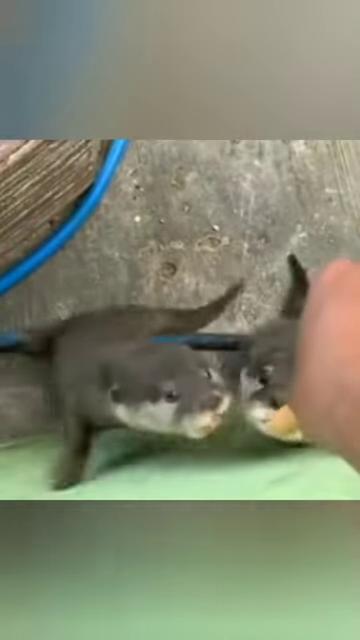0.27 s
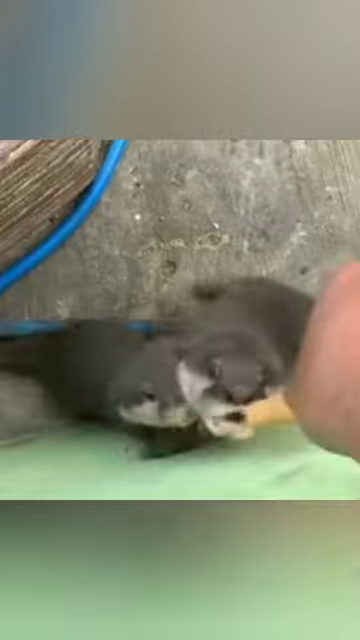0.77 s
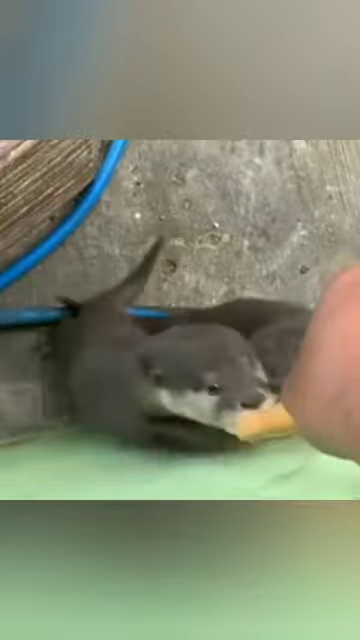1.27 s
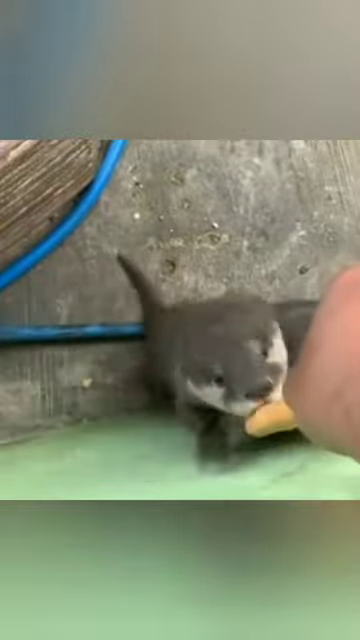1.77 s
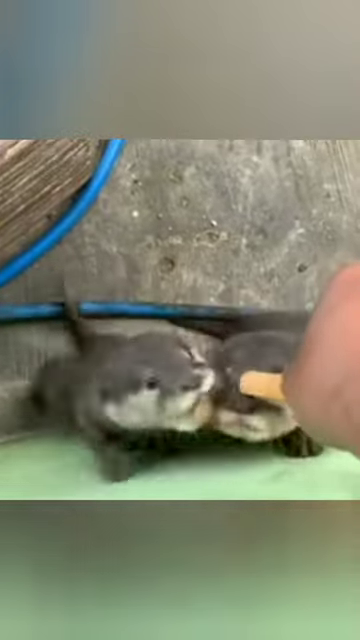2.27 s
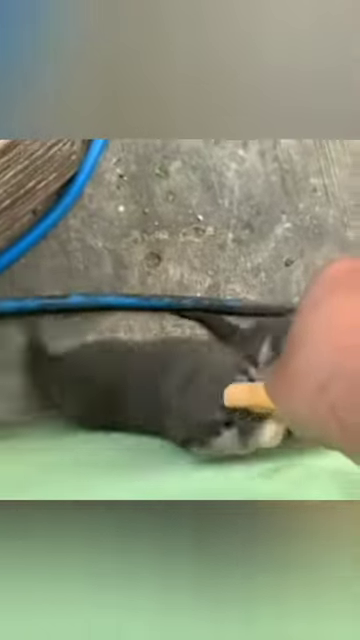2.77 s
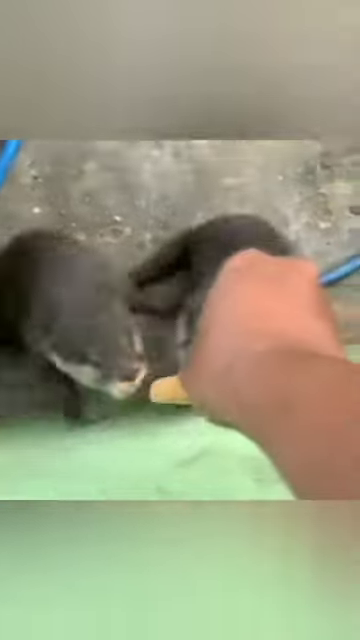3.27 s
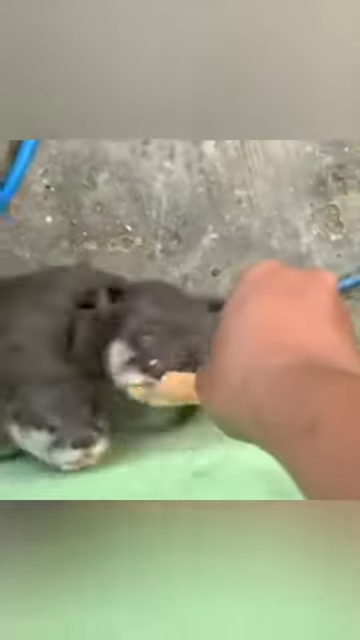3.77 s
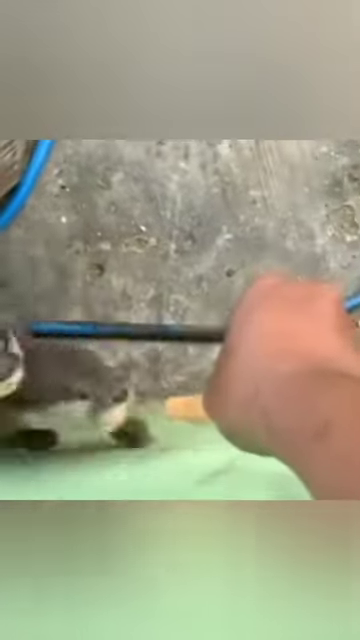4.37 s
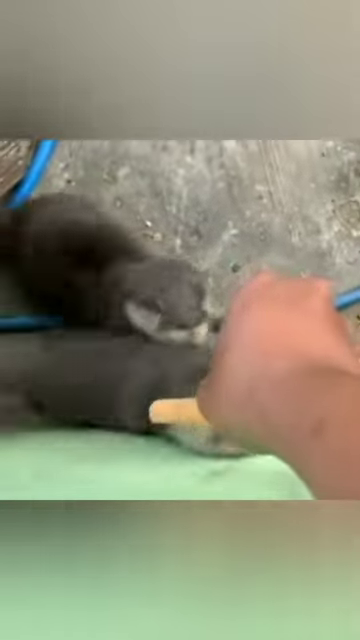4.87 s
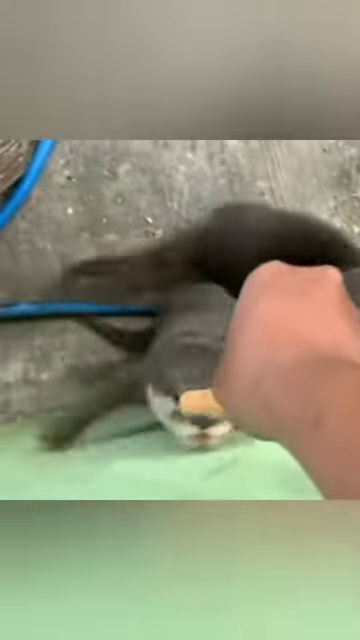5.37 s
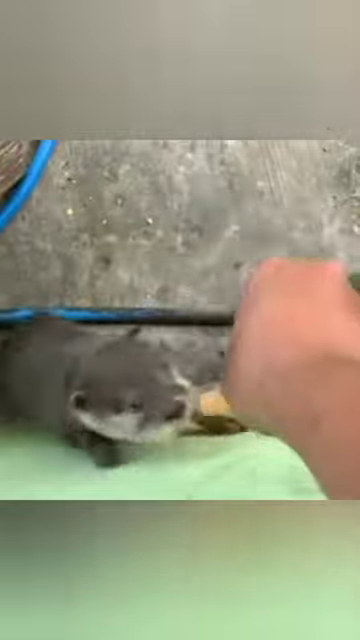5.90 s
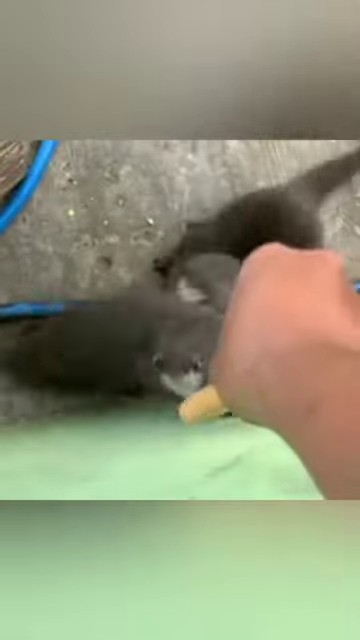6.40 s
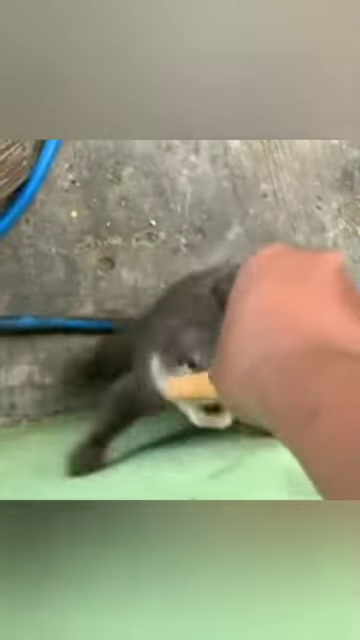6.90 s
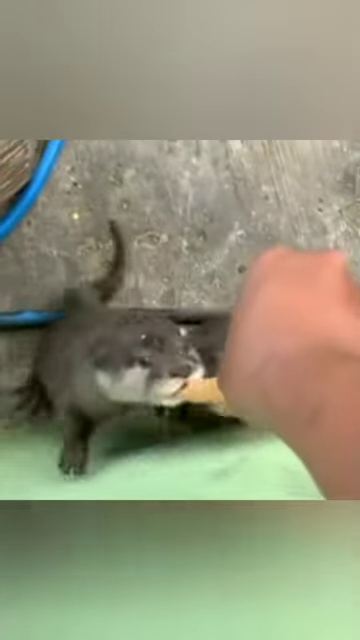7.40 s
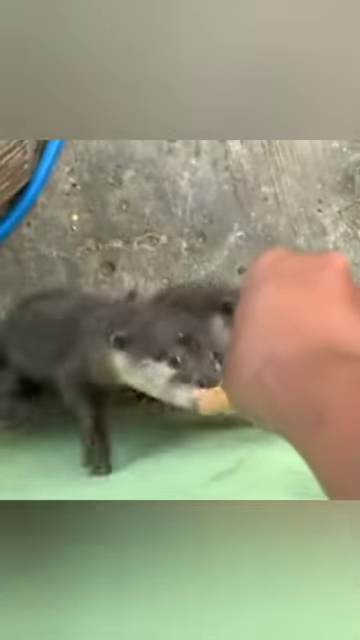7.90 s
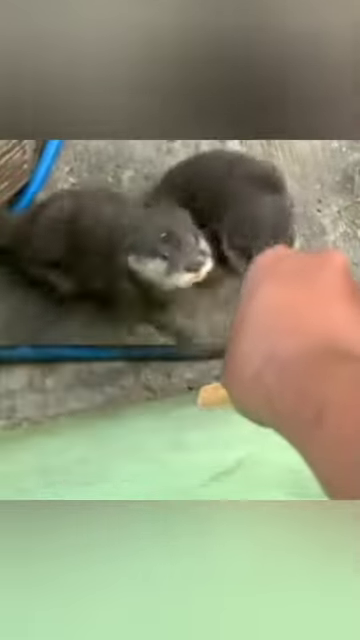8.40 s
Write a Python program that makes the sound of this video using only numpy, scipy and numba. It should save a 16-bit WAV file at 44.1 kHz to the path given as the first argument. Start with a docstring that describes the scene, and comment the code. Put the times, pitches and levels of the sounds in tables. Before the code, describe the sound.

The sound opens mid-scream: a close otter pup's shrill, raspy cry wavers until about 0.8 s, with thin high whistles near 0.5 and 0.75 s. At 1.0 and 2.0 s come long squeals of about three quarters of a second, each whistle diving steeply into a voice around 1.2 kHz, clear then harsh. Shorter cries follow at 3.0 and 3.6 s, then a longer, partly clear one from 4.1 to 4.8 s. A tiny bright click of teeth or claws marks 5.1 s as a brief squeal starts; a higher, purer one comes at 5.9 s, another at 6.5 s. After a gap, a short yelp at 7.15 s leads into a rough cry to 7.8 s, and a last uneven squeal runs from 8.1 s to the end. Hard walls give short echoes. Faint hiss, rumble and a fading hum lie beneath; a distant engine drones from about 6.5 s, slowly dropping in pitch.

```python
"""Two otter pups beg at a hand on a concrete yard; it opens mid-scream, over swelling low noise, rumble, hiss and a fading hum.
Most later cries open with a whistle, an arching near-sine; then the vocal folds take over as a pulse train,
now clean stacks of harmonics, now a harsh irregular scream, shaped by throat and a moving mouth resonance.
From about 4 s come two small ticks of teeth or claws, and a small engine passes far off, a stack of low sines.
The yard adds short echoes; left and right differ in phase and level."""
import sys
import numpy as np
from scipy import signal
from scipy.fft import rfft, irfft, next_fast_len
from scipy.io import wavfile
from scipy.ndimage import uniform_filter1d
from numba import njit

SR = 44100
rng = np.random.default_rng(int(sys.argv[2]) if len(sys.argv) > 2 else 0)


def transcribe(u):
    """Save the signal u as a 16-bit wav file named by the first command-line argument.

    u: samples, shape (n,) or (channels, n), limited to [-1, 1]; the rate is SR.
    q: integer samples, one column per channel.
    """
    v = np.clip(np.atleast_2d(u).T, -1, 1)
    q = np.round(v * 32767).astype(np.int16)
    wavfile.write(sys.argv[1], SR, q)


N = 381447

# whistles: start t/s, length t/s, first f/Hz, top f/Hz, last f/Hz, first level/dB, peak level/dB,
# top at [share of length], loudest at [share of length],
# fall shape [power: over 1 hangs then drops, under 1 drops then levels off], raggedness [-]
WHISTLES = [(0.499, 0.1067, 7900, 8360, 4870, -40.5, -24, 0.238, 0.258, 0.86, .3),
            (0.729, 0.0833, 6720, 8515, 5514, -24.5, -18, .42, 0.676, 1.89, .3),
            (.4, .22, 1500, 2020, 1950, -47, -40, .7, .7, 1.0, 1.2),
            (0.823, 0.1146, 4600, 4492, 4019, -30.5, -24.5, 0.212, 0.812, 0.96, .15),
            (0.962, 0.0698, 6600, 8684, 2770, -28, -19, .38, 0.567, 2.1, .5),
            (1.951, .067, 6300, 8206, 3190, -18, -15.5, 0.237, 0.5, 1.65, .45),
            (2.923, 0.06, 7200, 8052, 2670, -22.5, -17, 0.244, 0.547, 2.465, .6),
            (3.455, 0.1042, 6700, 8920, 5880, -51.5, -23, .36, 0.65, 0.488, .25),
            (3.536, 0.058, 6600, 7900, 3136, -30, -12.5, .5, 0.36, 2.6, .4),
            (4.042, 0.062, 6300, 8379, 3072, -23.5, -13.5, 0.29, .38, 2.55, .6),
            (4.82, 0.139, 7130, 5974, 4930, -53, -37, 0.174, 0.66, 0.815, .15),
            (5.049, 0.07, 6800, 8400, 3350, -26, -17.5, 0.35, 0.5, 3.2, 1.1),
            (5.782, 0.084, 6800, 8500, 2240, -38, -14, .22, .47, 1.6, .35),
            (6.295, 0.1145, 6600, 9076, 5748, -66, -28.5, .3, 0.6, 0.56, .3),
            (6.425, 0.0745, 6800, 9230, 2700, -62, -19, .3, 0.498, 1.154, .2),
            (6.493, 0.046, 3100, 2450, 2400, -34, -28, 0.75, .85, 1.57, .1),
            (7.655, .157, 1550, 1802, 1295, -35, -34, .45, 0.88, 2.6, .5),
            (8.051, 0.0629, 7600, 8910, 4039, -40, -14.5, .5, 0.49, 2.385, .45)]
RISE_POWER = 2.1   # the pitch rise rounds off into the top
ENDING_DB = -17   # a whistle ends this far below its peak
BEATEN_BELOW_HZ, BEATEN_DB = 2000, -3   # low whistles are beaten by the folds; lines above them, full at the end

# vocal fold rate in each cry, often dropping in from above as the whistle breaks: t/s, f/Hz
FOLDS = [(0, 1270), (.09, 1111), (.135, 1300), (.22, 1171), (.43, 1100), (.5, 1169), (.65, 1109),
         (.8, 1061), (1.0, 1800), (1.03, 1430), (1.08, 1390), (1.105, 1035), (1.168, 1075), (1.194, 1150),
         (1.206, 1080), (1.24, 1231), (1.27, 1221), (1.4, 1270), (1.495, 1310), (1.51, 1130), (1.75, 1101),
         (1.99, 2100), (2.01, 1560), (2.052, 1314), (2.072, 1318), (2.088, 1234), (2.112, 1301),
         (2.146, 1284), (2.17, 1187), (2.2, 1200), (2.24, 1109), (2.45, 1200), (2.62, 1084), (2.77, 1060),
         (2.96, 2150), (2.978, 1620), (3.0, 1403), (3.058, 1226), (3.088, 1270), (3.122, 1290),
         (3.154, 1314), (3.174, 1258), (3.22, 1260), (3.57, 2200), (3.595, 1612), (3.636, 1282),
         (3.652, 1226), (3.67, 1282), (3.704, 1206), (3.736, 1248), (3.87, 1239), (4.08, 2200),
         (4.098, 1619), (4.13, 1330), (4.185, 1180), (4.2, 1215), (4.244, 1170), (4.342, 1250),
         (4.364, 1128), (4.412, 1250), (4.458, 1247), (4.475, 1180), (4.55, 1280), (4.6, 1180),
         (4.62, 1230), (4.675, 1280), (4.72, 1070), (4.8, 1039), (5.105, 1389), (5.15, 1322), (5.176, 1387),
         (5.238, 1136), (5.288, 1247), (5.304, 1237), (5.328, 1284), (5.345, 1269), (5.9, 1347),
         (5.95, 1321), (5.976, 1280), (5.996, 1375), (6.015, 1375), (6.03, 1440), (6.052, 1381),
         (6.058, 2183), (6.13, 1995), (6.53, 1387), (6.56, 1423), (6.6, 1272), (6.68, 1246), (6.72, 1300),
         (6.78, 1240), (6.83, 1264), (7.155, 970), (7.23, 1140), (7.28, 1204), (7.5, 1073), (7.58, 1197),
         (7.62, 1106), (7.67, 1100), (7.74, 1278), (7.81, 970), (8.09, 1900), (8.11, 1466), (8.16, 1260),
         (8.21, 1270), (8.25, 1414), (8.32, 1184), (8.37, 1299), (8.44, 1233), (8.5, 1309), (8.538, 1264),
         (8.544, 1905), (8.57, 1800), (8.605, 2071), (8.613, 1495), (8.65, 1372)]
# screams, one list a cry: t/s, level/dB below the treble split, treble level/dB, mouth resonance f/Hz
SCREAMS = [
    [(0, -24.5, -30.5, 2550), (.05, -28, -26, 2605), (.105, -34, -23.5, 2700), (.14, -28.5, -27.5, 2820),
     (.2, -28, -26.5, 2610), (.28, -33.5, -34, 2450), (.39, -40.5, -54.5, 1680), (.46, -33.5, -42.5, 1880),
     (.55, -32, -43.5, 1930), (.63, -29, -31.5, 2110), (.68, -24, -28.5, 2240), (.74, -28, -34, 2275),
     (.795, -31, -34, 2306)],
    [(1.0, -45, -40, 4000), (1.03, -28, -18, 3090), (1.046, -35.5, -28, 2950), (1.09, -27.5, -21.5, 3060),
     (1.12, -31, -25, 3210), (1.2, -31.5, -29, 3005), (1.23, -30.5, -31, 2640), (1.29, -30.5, -33.5, 2750),
     (1.37, -30, -23, 2780), (1.41, -26, -21.5, 3220), (1.46, -25, -31, 3210), (1.53, -26, -31, 2890),
     (1.64, -31.5, -31, 3074), (1.735, -27.5, -30.5, 3220), (1.755, -30.5, -40, 3220)],
    [(1.99, -45, -35, 4200), (2.01, -28, -20.5, 3030), (2.04, -35, -26.5, 2906), (2.09, -36, -28.5, 2630),
     (2.15, -33, -30, 2670), (2.19, -36, -30, 2770), (2.225, -32.5, -27, 3230), (2.3, -35, -27, 2920),
     (2.35, -34.5, -30.5, 2880), (2.43, -34.5, -32, 2950), (2.53, -31.5, -34, 2595), (2.62, -32, -35, 2270),
     (2.71, -28.5, -30, 2620), (2.765, -33.5, -44, 2600)],
    [(2.96, -42, -35, 4300), (2.975, -35, -24.5, 3060), (3.01, -32, -28.5, 2820), (3.05, -33, -28.5, 2780),
     (3.1, -36.5, -28.5, 2710), (3.135, -33.5, -29, 2880), (3.165, -35.5, -24, 3650),
     (3.195, -30, -38.5, 3760), (3.217, -32, -41.5, 3790)],
    [(3.57, -48, -38, 4400), (3.59, -37, -30, 3010), (3.635, -28.5, -29, 2620), (3.7, -30, -31.5, 2490),
     (3.75, -34, -40.5, 2960), (3.785, -34.5, -44, 2640), (3.825, -27.5, -28.5, 2578),
     (3.87, -36, -35, 2630)],
    [(4.08, -46, -35, 4400), (4.095, -35.5, -27.5, 3080), (4.11, -31, -22.5, 3060),
     (4.14, -32.5, -22.5, 2940), (4.19, -33, -21.5, 2720), (4.295, -39, -28.5, 2510),
     (4.34, -36.5, -25, 2530), (4.42, -33.5, -32.5, 2530), (4.47, -33.5, -33.5, 2520),
     (4.55, -27.5, -33, 2610), (4.595, -35.5, -37.5, 2910), (4.625, -23, -37.5, 2660),
     (4.665, -24, -34.5, 2470), (4.71, -31.5, -48.5, 1980), (4.77, -31.5, -41.5, 2020),
     (4.8, -37.5, -48.5, 2040)],
    [(5.105, -44.5, -12, 2830), (5.125, -29.5, -28, 2800), (5.175, -43.5, -37, 2580),
     (5.205, -27, -31, 2550), (5.245, -40.5, -35, 2360), (5.278, -29, -34.5, 2450), (5.335, -30, -31, 2990),
     (5.352, -34.5, -44, 3180)],
    [(5.85, -60, -50, 3000), (5.87, -52, -43, 2500), (5.9, -49, -46, 2120), (5.92, -34.5, -43, 2150),
     (5.95, -33.5, -37.5, 2450), (5.975, -27, -45.5, 2600), (6.008, -32.5, -33.5, 2630),
     (6.03, -33, -45.5, 2630), (6.06, -34.5, -39, 2210), (6.09, -34.5, -34, 2170),
     (6.135, -47.5, -43.5, 2155)],
    [(6.53, -34, -32, 2510), (6.56, -30.5, -42.5, 1900), (6.6, -28, -40, 1800), (6.632, -25.5, -28.5, 2610),
     (6.68, -29.5, -35, 2740), (6.715, -26.5, -24, 3045), (6.76, -31, -28.5, 2890),
     (6.795, -29, -32.5, 2850), (6.835, -27.5, -44.5, 3160)],
    [(7.155, -42, -55.5, 3020), (7.166, -28.5, -41.5, 3040), (7.22, -28.5, -31.5, 2950),
     (7.238, -40, -45, 2970)],
    [(7.28, -34, -35.5, 2447), (7.345, -38, -42.5, 2490), (7.375, -32.5, -31.5, 2630),
     (7.5, -29.5, -34.5, 3150), (7.54, -28.5, -27.5, 2800), (7.572, -28.5, -23.5, 2520),
     (7.6, -29, -30.5, 2780), (7.612, -28.5, -36, 3330), (7.652, -30, -40, 3300), (7.672, -31.5, -41, 1780),
     (7.7, -34.5, -48, 1766), (7.74, -30.5, -49, 1750), (7.765, -38, -50, 1230), (7.812, -42, -57.5, 1020)],
    [(8.09, -44, -35, 3200), (8.11, -28, -31, 2830), (8.155, -29.5, -29.5, 2600), (8.2, -36, -31.5, 2520),
     (8.22, -40, -53.5, 2430), (8.26, -38, -48.5, 1750), (8.303, -26, -37, 2430), (8.35, -35, -36, 2450),
     (8.375, -17.5, -34.5, 2580), (8.4, -33, -32.5, 2620), (8.44, -41.5, -57.5, 2400),
     (8.465, -37, -49, 1800), (8.505, -26, -36, 2590), (8.545, -39.5, -41, 1960), (8.6, -34.5, -54.5, 2150),
     (8.649, -43.5, -68.5, 2600)],
]
# throat and mouth colour: f/Hz, level/dB
THROAT = [(300, -48), (850, -11), (1030, -3.5), (1300, 1.5), (1700, 6.5), (2400, -0.5), (3300, 2),
          (4200, 4.5), (5000, -1), (6500, -9.5), (8000, -11.5), (10000, -13.5), (11500, -12),
          (13000, -10.5)]
MOUTH_DB, MOUTH_WIDTH_HZ, HARSH_WIDENS = 8.5, 430, .9   # width of a smooth voice; roughness widens it by this share
HARSH, SETTLE_S = .85, .015   # usual roughness (0-1) before the rasp; time to settle or break up
# passages with their own roughness, mostly clearer: start t/s, end t/s, roughness [0-1]
CLEARER = [(0, .125, .25), (.24, .42, .55), (1.0, 1.095, .95), (1.095, 1.19, .22), (1.19, 1.27, .35),
           (1.27, 1.43, .7), (1.43, 1.51, .17), (2.0, 2.035, .75), (2.035, 2.19, .16), (2.19, 2.64, .67),
           (2.975, 3.055, .55), (3.055, 3.125, .3), (3.15, 3.28, .25), (3.595, 3.69, .5), (3.69, 3.755, .3),
           (3.755, 3.79, .6), (3.79, 3.88, 1.0), (4.1, 4.2, .6), (4.2, 4.47, .27), (4.595, 4.68, .05),
           (5.15, 5.25, .28), (5.25, 5.345, .14), (5.945, 6.015, .17), (6.015, 6.055, .55),
           (6.055, 6.13, .2), (6.62, 6.66, .35), (6.66, 6.695, .5), (6.775, 6.87, .15), (7.15, 7.21, .3),
           (7.27, 7.33, .4), (7.33, 7.59, .95), (7.6, 7.66, .12), (7.76, 7.83, .27), (8.125, 8.21, .15),
           (8.29, 8.345, .2), (8.358, 8.4, .25), (8.54, 8.65, .4)]
# strong-weak beating of the folds, which adds half-way lines: t/s, depth [0-1]
ALTERNATE = [(1.445, 0), (1.46, .4), (1.498, .4), (1.505, 0)]
RELEASE_DB_PER_S, EDGE_S = 2500, .007   # how fast a cry dies as it breaks off; span that softens its edges

# small ticks of teeth or claws: t/s, envelope peak level/dB, ring f/Hz
TICKS = [(4.0138, -45, 1800), (5.0883, -15, 8000)]
TICK_S = .0006   # time to swell to the peak, and decay constant

# low noise swelling, mostly under the rough screams: t/s, peak level/dB, time to fade 10 dB either side t/s
LOW_SWELLS = [(.04, -55.5, 0.074), (.21, -52.5, 0.0425), (.68, -54, 0.18), (1.08, -51, 0.01),
              (1.5, -53, 0.1465), (2.4, -59.5, 0.13), (2.7, -57, 0.01), (3.66, -64, 0.17),
              (4.17, -52, 0.03), (4.55, -56, 0.0266), (7.44, -48, 0.01), (7.68, -48, 0.09),
              (7.78, -46, 0.0731)]
# steady low noise that grows as the engine nears: t/s, level/dB
NEARING = [(0, -77.5), (2, -78), (3.1, -66), (5.7, -66), (6.7, -54), (7.6, -55.5), (8.65, -56.5)]
# colour of both: f/Hz, level/dB per Hz
LOW_NOISE_COLOUR = [(120, -36.5), (250, -5), (320, -1.5), (500, -7.5), (800, -8.5), (1000, -24)]

# engine, slowing as it nears: t/s, firing f/Hz, second multiple level/dB, fourth multiple level/dB
ENGINE = [(4.2, 54.36, -82.5, -81), (4.5, 54.35, -69.5, -67), (5.7, 53.47, -71.5, -66),
          (6.07, 52.65, -61.5, -74.5), (6.4, 51.94, -51.5, -72.5), (6.9, 51.55, -42, -59.5),
          (7.37, 49.53, -43.5, -48), (7.8, 47.94, -45, -43), (8.13, 47.04, -43, -49),
          (8.65, 45.14, -48, -48)]
# its other multiples: multiple [-], level/dB when near, share of the second's swell that it follows [0-1]
ENGINE_ORDERS = [(1, -57, .25), (3, -60, .6), (5, -64.5, .4), (6, -58.5, 0.36), (7, -66, 0.65),
                 (8, -67.5, 0.36), (9, -63.5, 0.3)]

# a faint hum that fades: t/s, f/Hz, level/dB
HUM = [(0, 142.7, -65.5), (1.5, 138.5, -71), (2.3, 146.3, -83.5), (8.65, 139.7, -99.5)]
# traffic rumble: t/s, level/dB
RUMBLE_LEVEL = [(0.0, -63), (8.65, -58)]
# its colour: f/Hz, level/dB per Hz
RUMBLE_COLOUR = [(12, -29.5), (20, -9.5), (71, -0.5), (147, -8.5), (218, -3), (270, -7.5), (471, -18.5),
                 (1000, -47.5), (1300, -57.5), (2200, -120)]
# outdoor hiss colour: f/Hz, level/dB per Hz
HISS_COLOUR = [(240, -47.5), (400, -29.5), (470, -12.5), (680, -27), (860, -13.5), (1510, -8), (1640, -13),
               (2240, -11), (4960, -19), (9000, -28), (13500, -40)]
HISS_DB = -61.5

# phase between the channels: f/Hz, right behind left [radians]
STEREO_PHASE = [(100, 0), (2000, .15), (2900, .5), (3700, 2.4), (4800, 2.9), (5500, 3.2), (6200, 4.2),
                (7000, 5.7), (8300, 6.28), (9600, 6.7), (10400, 7.8), (11200, 9.3), (13500, 9.42)]
# balance between the channels: f/Hz, left minus right level/dB
STEREO_BALANCE = [(100, 0), (700, -1.5), (2500, -0.01), (3500, -8.5), (4500, -2), (6000, 1)]
YARD_T60_S, YARD_DB, YARD_ABOVE_HZ = .33, -16.5, 900   # one echo tail for both channels
APART_T60_S, APART_DB, APART_ABOVE_HZ = .08, -9, 2000   # near reflections, different in each channel
CUTOFF_HZ = 13835   # 60 dB down from here up


def whistles(octave_db=-14, waver=0.0091, flutter_db=3.0, air_db=-16, fray_hz=700, burst_db=-21, burst_s=.015):
    """Near sines with a faint octave; each frays toward its end and closes in a burst of air."""
    out = np.zeros(N)
    wobble, flutter, fray = drift(140), drift(130), drift(fray_hz)
    folds_phase = running_phase(in_time(sorted(FOLDS))[0])
    throaty = rms_one(filtered(coloured(rng.standard_normal(N), THROAT), 2, 2200, "high"))
    bright = rms_one(filtered(rng.standard_normal(N), 2, [5500, 11000], "band"))
    air = throaty * 0.3 + bright
    for (start_s, length_s, first_hz, top_hz, last_hz, first_db, peak_db,
         top_at, loud_at, fall, ragged) in WHISTLES:
        at = np.arange(int(start_s * SR), int((start_s + length_s) * SR))
        progress = np.linspace(0, 1, len(at))
        top_at, loud_at = np.clip([top_at, loud_at], .05, .95)
        pitch_hz = arch(progress, top_at, first_hz, top_hz, last_hz, RISE_POWER, np.clip(fall, .3, 4))
        level_db = arch(progress, loud_at, first_db, peak_db, peak_db + ENDING_DB, 1.02, 1.46)

        # the pitch wobbles more and more toward the end
        wobbling = 1 + waver * (.6 + 3 * progress ** 2) * wobble[at]
        phase = running_phase(pitch_hz * wobbling)
        tone = np.sin(phase) + amp(octave_db) * np.sin(2 * phase)
        if top_hz < BEATEN_BELOW_HZ:
            upper_lines = np.sin(phase + folds_phase[at]) + np.sin(phase + 2 * folds_phase[at])
            tone = tone + amp(BEATEN_DB) * progress ** 2 * upper_lines

        # the steady tone hands over to a noise-modulated one
        frayed = np.clip(1.5 * ragged * progress ** 3.5, 0, 1)
        tone = np.sqrt(2) * tone * (np.sqrt(1 - frayed) + np.sqrt(frayed) * fray[at])
        gain = amp(level_db + flutter_db * flutter[at]) * signal.windows.tukey(len(at), .11)
        out[at] += gain * (tone + amp(air_db) * progress ** 2 * air[at])

        # the burst peaks where the tone stops
        near = np.arange(at[0], min(at[-1] + SR // 10, N))
        burst = np.exp(-((near - at[-1]) / SR / burst_s) ** 2)
        burst = burst * np.minimum((near - at[0]) / len(at), 1)
        out[near] += amp(peak_db + burst_db) * np.clip(ragged, 0, 1) * burst * throaty[near]
    return out


def arch(progress, at, first, top, last, rise, fall):
    """From first up to top at share `at` of the way, on to last; the powers round the two sides."""
    rising = top + (first - top) * np.abs(1 - progress / at) ** rise
    falling = top + (last - top) * np.abs((progress - at) / (1 - at)) ** fall
    return np.where(progress < at, rising, falling)


def screams(wobble=.011, jitter=.035, slip_rad=.6, shimmer=.2, treble_air_db=-13,
            flap_hz=150, flap=.35, flap_rad=.6, flap_waver=.05,
            breath_db=-5.5, rasp_db=1.6, uneven_db=5.5, core=.2, flicker_db=2.5, split_hz=4900):
    """A pulse each fold cycle; roughness scatters timing and strength and lets air noise through."""
    (rate_hz,) = in_time(sorted(FOLDS))
    low_db, treble_db, mouth_hz = in_time(sorted(tuple(row) for rows in SCREAMS for row in rows))
    (alternate,) = in_time(ALTERNATE)
    rough = roughness() * amp(rasp_db * drift(18))   # the rasp comes and goes

    # early and late pulses blur the upper harmonics most
    phase = running_phase(rate_hz * (1 + wobble * drift(45) + jitter * rough * drift(150)))
    slipped = phase + slip_rad * rough ** 1.282 * drift(605)
    # loose tissue flaps slowly and puts side lines round each harmonic
    flapping = running_phase(flap_hz * (1 + flap_waver * drift(14) + 3 * flap_waver * drift(2)))
    slipped = slipped + flap_rad * rough * np.sin(flapping)

    # each harmonic swells and fades in its own time
    uneven = amp(uneven_db * drift(23))
    pulses = np.zeros(N)
    for k in range(2, 12):
        harmonic = np.cos(k * slipped + .4 * k * k) * (k * rate_hz < 15000)
        pulses += np.roll(uneven, 30011 * k) * harmonic
    # the lowest line is weak while the rate plunges
    slope_hz_per_s = np.gradient(rate_hz) * SR
    pulses = pulses + np.clip(1 + slope_hz_per_s / 18000, .15, 1) * np.cos(slipped)
    pulses = pulses * (1 + flap * rough * np.cos(flapping))
    pulses = pulses * (1 + shimmer * rough * drift(400))
    pulses = pulses * (1 + alternate * np.cos(phase / 2))
    pulses = pulses + core * rough * uneven * np.cos(phase)   # the mean fold rate comes and goes as a line

    air = rng.standard_normal(N) * (1.6 + np.cos(slipped))   # puffs with each cycle
    voiced = coloured(pulses + amp(breath_db) * rough ** 1.4 * air, THROAT)

    low = signal.sosfiltfilt(signal.butter(4, split_hz, fs=SR, output="sos"), voiced)
    mouth_width_hz = MOUTH_WIDTH_HZ * (1 + HARSH_WIDENS * rough)
    low = low + amp(MOUTH_DB) * glide(low, mouth_hz, mouth_width_hz, SR)

    # the treble is breathier
    breathy = voiced + amp(treble_air_db) * rough * coloured(air, THROAT)
    flicker = amp(flicker_db * drift(16))
    treble = np.zeros(N)
    for k, edges_hz in enumerate([(split_hz, 7000), (7000, 9000), (9000, 11000), (11000, 15000)]):
        band = signal.sosfiltfilt(signal.butter(2, edges_hz, "band", fs=SR, output="sos"), breathy)
        treble += np.roll(flicker, 40009 * k) * band
    cries = amp(low_db) * evened(low, 0.02) + amp(treble_db) * evened(treble, 0.081)
    return released_gate(SCREAMS, EDGE_S) * cries


def roughness():
    """How unevenly the folds beat: harsh, except in the passages set apart."""
    rough = np.full(N, HARSH)
    for start_s, end_s, value in CLEARER:
        rough[int(start_s * SR):int(end_s * SR)] = value
    return uniform_filter1d(rough, int(SETTLE_S * SR), mode="nearest")


@njit
def glide(x, hz, width_hz, sr):
    """A two-pole resonance whose centre and width move; gain about 1 on top."""
    out, radius = np.zeros(len(x)), np.exp(-np.pi * width_hz / sr)
    for i in range(2, len(x)):
        r = radius[i]
        driven = (1 - r * r) / 2 * (x[i] - x[i - 2])
        ringing = 2 * r * np.cos(2 * np.pi * hz[i] / sr) * out[i - 1] - r * r * out[i - 2]
        out[i] = driven + ringing
    return out


def ticks():
    """Teeth or claws: one short ring each, a sine under a quick swell and decay."""
    out, t = np.zeros(N), np.arange(SR // 100) / SR
    for start_s, peak_db, ring_hz in TICKS:
        envelope = np.e * t / TICK_S * np.exp(-t / TICK_S)
        start = int(start_s * SR)
        out[start:start + len(t)] += amp(peak_db) * envelope * np.sin(2 * np.pi * ring_hz * t)
    return out


def low_noise():
    """Low noise swells over a steady share; the channels hold partly the same noise."""
    t = np.arange(N) / SR
    own, shared = rng.standard_normal((2, N)), rng.standard_normal(N)
    power = amp(in_time(NEARING)[0]) ** 2
    for peak_s, peak_db, fade_s in LOW_SWELLS:
        power = power + amp(peak_db - 10 * np.abs(t - peak_s) / fade_s) ** 2
    noise = rms_one(coloured(shared + 0.76 * own, LOW_NOISE_COLOUR))
    return np.sqrt(power) * amp(2.7 * drift(12)) * noise


def engine(waver_db=2.5):
    """Low multiples of the firing rate, each wavering in its own time."""
    firing_hz, second_db, fourth_db = in_time(ENGINE)
    swell_db = second_db - second_db.max()
    levels = [(2, second_db), (4, fourth_db)]
    levels += [(round(k), near_db + share * swell_db) for k, near_db, share in ENGINE_ORDERS]
    phase = running_phase(firing_hz * (1 + 0.00401 * drift(7.4)))
    waver = amp(waver_db * drift(8.6))
    tones = np.zeros(N)
    for k, db in levels:
        tones += amp(db) * np.roll(waver, 20011 * k) * np.sin(k * phase - k)
    return np.sqrt(2) * tones * uniform_filter1d(inside([ENGINE]), int(.4 * SR) + 1)


def hum():
    """One low sine, gliding in pitch and wavering in level."""
    hz, db = in_time(HUM)
    return np.sqrt(2) * amp(db + 3.1 * drift(4.4)) * np.sin(running_phase(hz))


def rumble():
    """Traffic: low coloured noise whose level drifts slowly."""
    noise = rms_one(coloured(rng.standard_normal(N), RUMBLE_COLOUR))
    return amp(in_time(RUMBLE_LEVEL)[0] + 3.5 * drift(3)) * noise


def hiss():
    """Outdoor air: coloured noise, independent in the two channels, drifting together."""
    noise = rms_one(coloured(rng.standard_normal((2, N)), HISS_COLOUR))
    return amp(HISS_DB + 0.98 * drift(7.5)) * noise


def yard(x):
    """A longer tail spread to stereo, and shorter near reflections that differ in each channel."""
    echoes = scatter(x, YARD_ABOVE_HZ, YARD_T60_S, channels=1)[0]
    reflections = scatter(x, APART_ABOVE_HZ, APART_T60_S, channels=2)
    return amp(YARD_DB) * stereo(echoes) + amp(APART_DB) * reflections


def scatter(x, above_hz, t60_s, channels):
    """Echoes off the walls: dying noise tails, high-passed."""
    t = np.arange(SR // 3) / SR
    tail = rng.standard_normal((channels, len(t))) * amp(-60 * t / t60_s) * (t > .003)
    tail = tail / np.sqrt(np.sum(tail ** 2) / channels)
    tail = filtered(tail, 4, above_hz, "high")
    return signal.fftconvolve(x[None], tail)[:, :N]


def stereo(x):
    """Left and right differ in phase and level: half of each difference goes to each channel."""
    size = next_fast_len(N)
    half = amp(at_hz(STEREO_BALANCE, size) / 2) * np.exp(.5j * at_hz(STEREO_PHASE, size))
    return irfft(rfft(x, size) * np.array([half, 1 / half]), size)[:, :N]


def amp(db):
    """dB to gain."""
    return 10 ** (np.asarray(db) / 20)


def rms_one(x):
    """Scaled to rms 1."""
    return x / np.sqrt(np.mean(x ** 2) + 1e-20)


def evened(x, span_s):
    """Local rms brought to 1."""
    return x / np.sqrt(uniform_filter1d(x ** 2, int(span_s * SR)) + 1e-12)


def in_time(rows):
    """Columns of a curve at every sample."""
    s, *columns = np.transpose(rows)
    return [np.interp(np.arange(N) / SR, s, column) for column in columns]


def running_phase(hz):
    """Phase in radians of a moving frequency."""
    return 2 * np.pi * np.cumsum(hz) / SR


def at_hz(points, size):
    """A spectrum table on the bins of a transform, straight lines over log frequency."""
    hz = np.maximum(np.fft.rfftfreq(size, 1 / SR), 1)
    table_hz, values = np.array(points).T
    return np.interp(np.log(hz), np.log(table_hz), values)


def coloured(x, spectrum):
    """Through a filter drawn as f/Hz, level/dB."""
    size = next_fast_len(N)
    return irfft(rfft(x, size) * amp(at_hz(spectrum, size)), size)[..., :N]


def filtered(x, order, hz, kind):
    """Through a Butterworth filter."""
    return signal.sosfilt(signal.butter(order, hz, kind, fs=SR, output="sos"), x)


def drift(rate_hz):
    """Low-passed noise of rms 1; the first second is dropped to let the filter settle."""
    return rms_one(filtered(rng.standard_normal(N + SR), 2, rate_hz, "low")[SR:])


def inside(tables):
    """1 inside the tables' time spans, 0 elsewhere."""
    gate = np.zeros(N)
    for rows in tables:
        gate[int(rows[0][0] * SR):int(rows[-1][0] * SR) + 2] = 1
    return gate


def released_gate(tables, edge_s):
    """1 inside the tables' time spans, dying away after each; edges softened."""
    last_inside = np.maximum.accumulate(inside(tables) * np.arange(N))
    since_s = (np.arange(N) - last_inside) / SR
    return uniform_filter1d(amp(-RELEASE_DB_PER_S * since_s), int(edge_s * SR) + 1)


def scene():
    """Pups near, engine and traffic far, hiss all around."""
    pups = whistles() + screams() + ticks()
    spread = stereo(pups + engine() + hum() + rumble())
    return spread + yard(pups) + low_noise() + hiss()


def record(dry):
    """The top is cut steeply."""
    return signal.sosfilt(signal.cheby2(14, 60, CUTOFF_HZ, fs=SR, output="sos"), dry)


dry = scene()
out = record(dry)
transcribe(out)
```